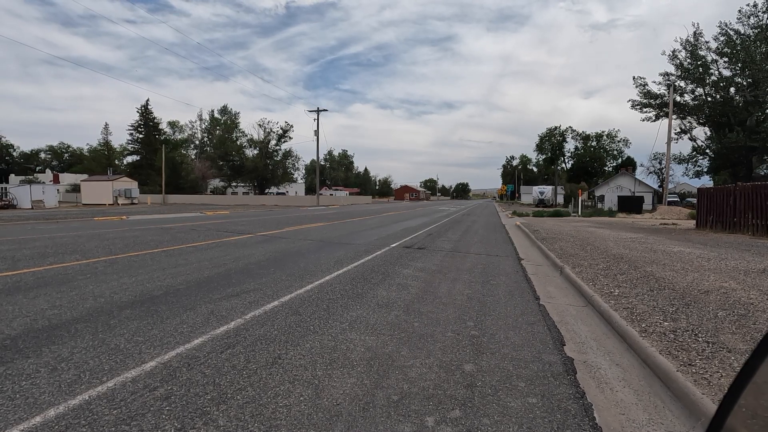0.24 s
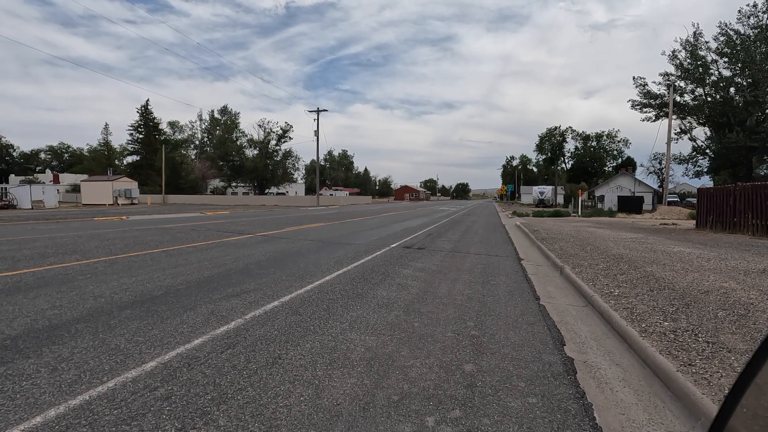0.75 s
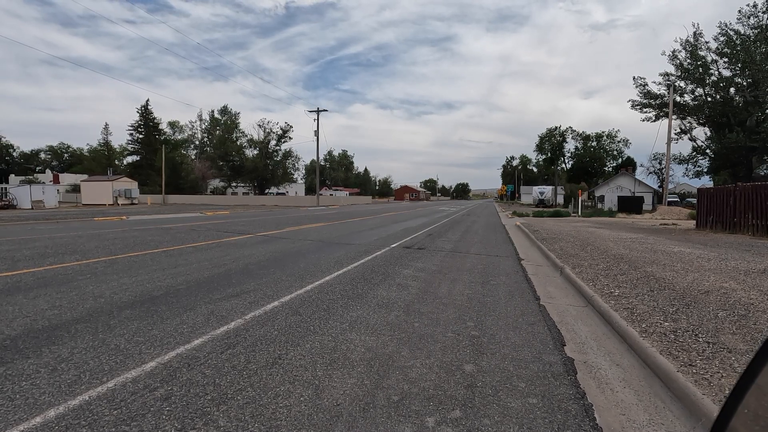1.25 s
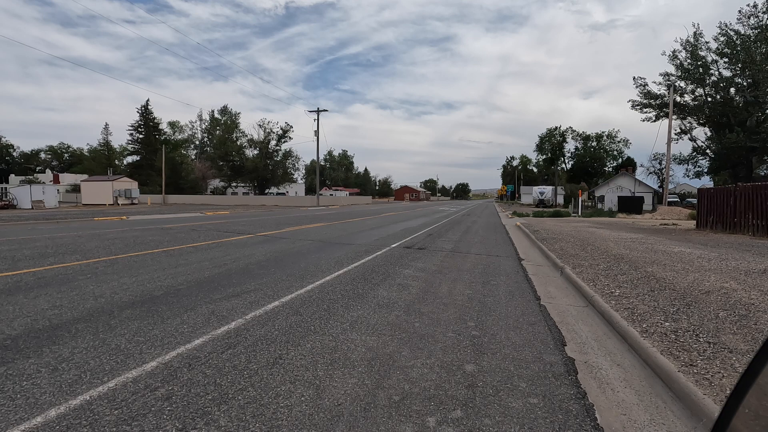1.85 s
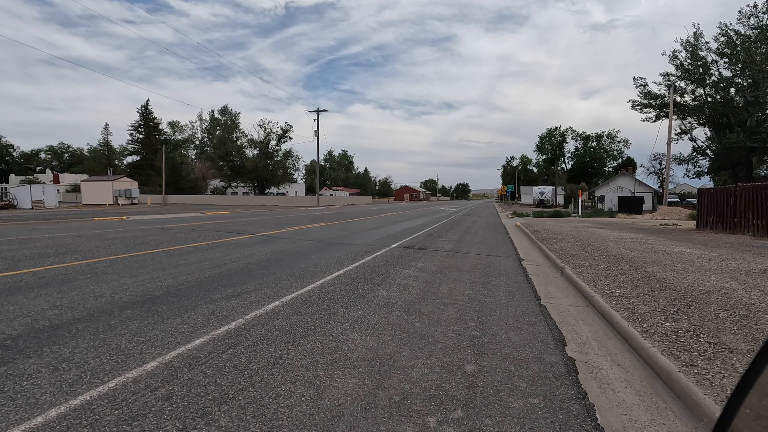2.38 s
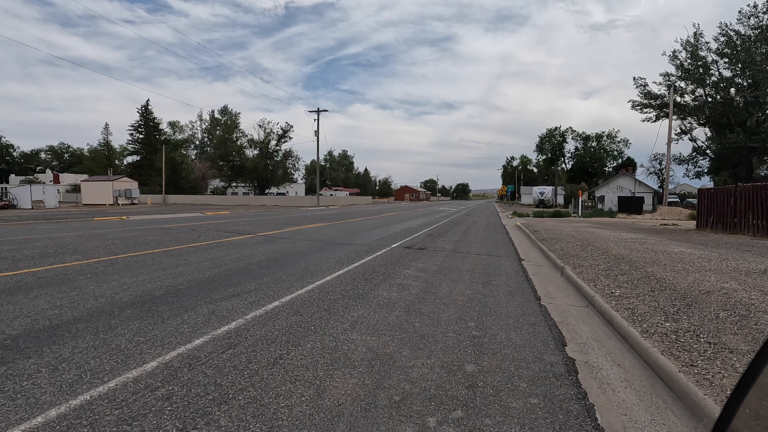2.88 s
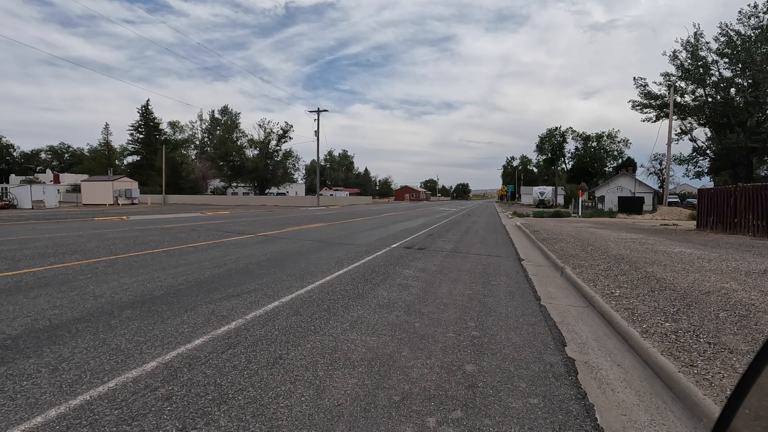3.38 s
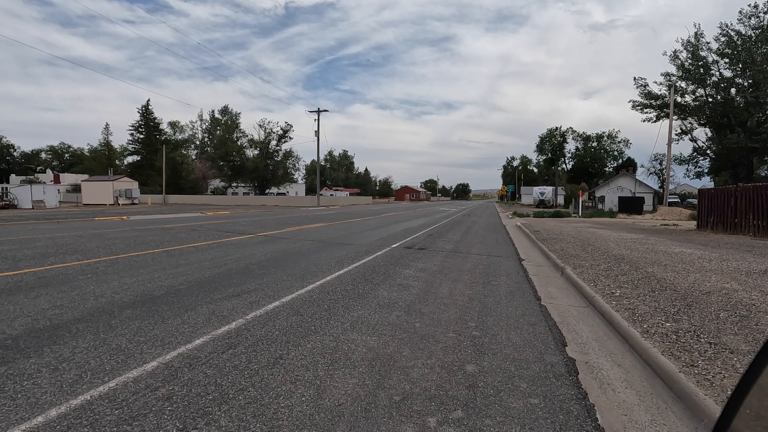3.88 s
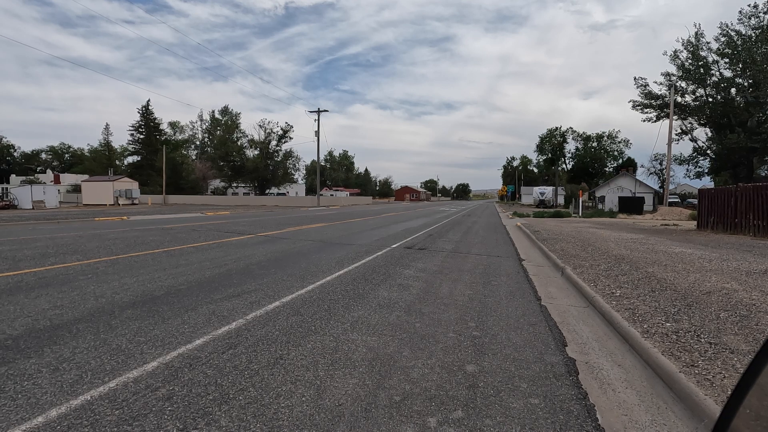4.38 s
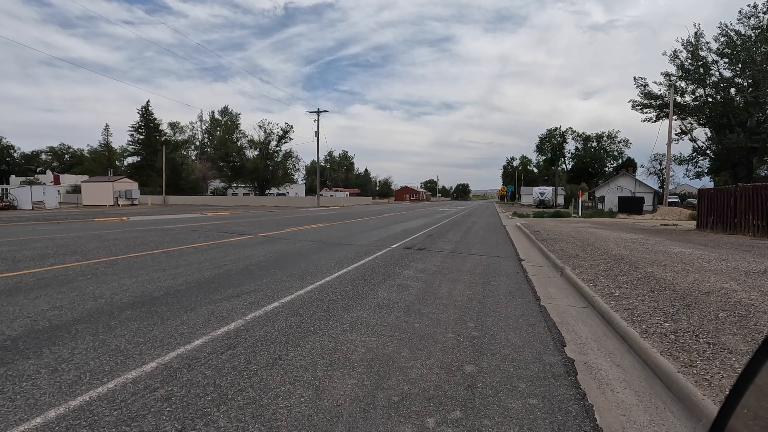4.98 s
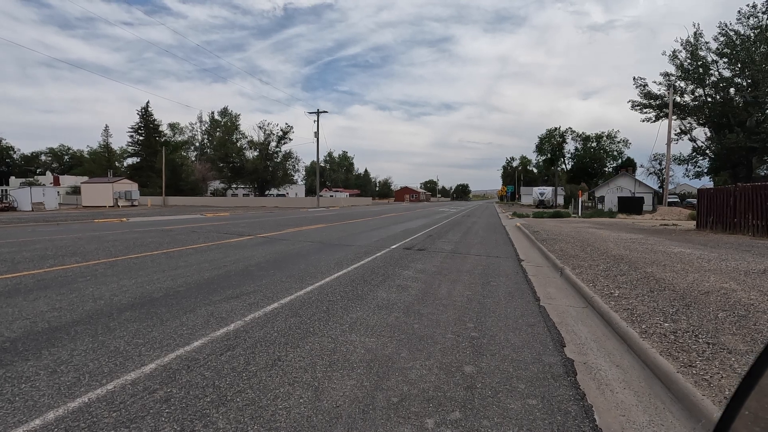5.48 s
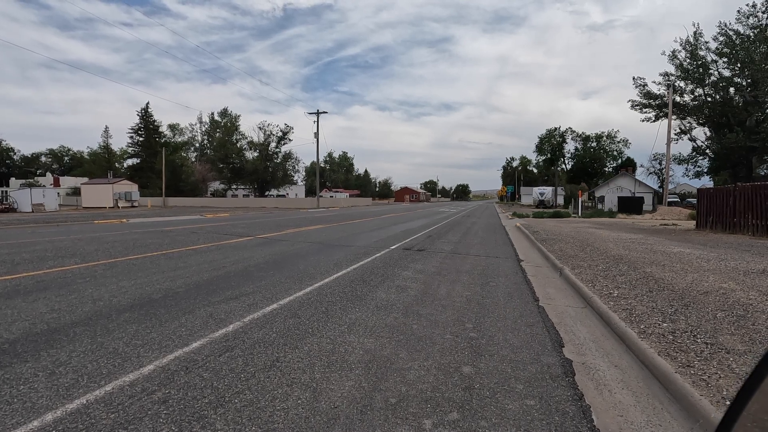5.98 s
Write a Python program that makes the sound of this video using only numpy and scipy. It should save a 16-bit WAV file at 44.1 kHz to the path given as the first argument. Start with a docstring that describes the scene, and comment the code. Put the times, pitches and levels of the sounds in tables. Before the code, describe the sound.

A motorcycle's starter grinds and chugs through two failed cranking attempts, whirring down between them while a vehicle passes on a quiet street.

```python
"""A motorcycle's starter cranks its V-twin engine in two tries without catching; a last grind begins a third.
Gear teeth grind, crackle, hum and squeal under each compression, and the starter whirrs down between tries.
Each exhaust stroke is a tone that glides upward, short barks are hoarse gliding tones, and a kickback knocks.
Behind it all, another vehicle swells and fades: steady engine tones over a rush of noise."""
import sys
import numpy as np
from scipy import signal
from scipy.io import wavfile

SR = 44100
rng = np.random.default_rng(int(sys.argv[2]) if len(sys.argv) > 2 else 0)


def unload_wav(signal):
    """Save mono or channel-first audio to the path in sys.argv[1] as 16-bit WAV at rate SR, clipped to [-1, 1]."""
    wavfile.write(
        sys.argv[1],
        SR,
        np.round(np.clip(np.atleast_2d(signal).T, -1, 1) * 32767).astype(np.int16),
    )


N = 275184
T = np.arange(N) / SR   # time of each sample in seconds

# Presses of the starter button.
# Each row: pressed at seconds, released at seconds, coasting time in seconds, whirr in relative dB.
PRESSES = [(-.5, .845, .6, -44.5), (3.79, 5.412, .81, -35)]
# Compressions that load the starter.
# Each row: start in seconds, length in seconds, then grind, gear hum and crackle in relative dB.
LOADS = [(0.024, 0.091, -22, -31, -35), (0.172, 0.12, -22.5, -22.5, -34), (0.312, 0.096, -23.5, -24, -34),
         (0.463, 0.077, -33, -29, -39), (0.547, 0.13, -28, -30, -32.5), (0.744, 0.08, -24.5, -32, -35),
         (0.815, 0.039, -29, -26, -33), (3.788, 0.115, -27, -26, -36), (3.88, 0.097, -24.5, -44, -29),
         (3.952, 0.099, -26.5, -24.5, -38), (4.096, 0.064, -23.5, -23, -27),
         (4.155, 0.074, -21, -19.5, -36), (4.237, 0.096, -24, -22, -27.5), (4.376, 0.089, -21, -25, -30.5),
         (4.485, 0.057, -23.5, -19, -41), (4.546, 0.078, -27, -24, -28.5), (4.669, 0.1, -23, -31, -32.5),
         (4.843, 0.09, -22.5, -28, -32), (4.983, 0.058, -26.5, -28, -34), (5.099, 0.1, -23.5, -26, -29),
         (5.281, .09, -24.5, -26, -37), (5.382, 0.047, -28.5, -23, -43), (6.219, 0.11, -20, -32, -30)]
# Overtones of the gear hum. Each row: multiple of the tooth rate, relative level in dB.
GEAR_OVERTONES = [(1, 0), (2, -8), (3, -17), (4, -14), (5, -18), (6, -20), (7, -19)]
# Hard steel parts that the crackle sets ringing. Each row: pitch in Hz, width in Hz.
STEEL_PARTS = [(2650, 560), (3200, 270), (3650, 900), (4150, 1050), (5100, 330)]
# Resonances of the crankcase.
# Each row: pitch in Hz, width in Hz (65 at least is used), average level in dB over the plain sound.
CASTING = [(531, 56, 12), (1036, 310, 10), (1686, 410, 5), (1708, 25, 11), (1830, 50, 6), (2230, 246, 14),
           (2650, 164, 10.5), (2986, 253, 10.5), (3504, 21.7, 9), (3893, 28, 11.5), (4100, 37, 4),
           (5160, 36, -3.5)]
# Tone colours of the noisy sounds. Each row: frequency in Hz, relative level in dB.
GRINDING = [(100, -36), (200, 10.5), (310, 15.5), (500, -1), (720, -4), (1300, -2.5), (2200, -9),
            (4000, -8), (5500, -11), (7500, -15.5), (10500, -17.5), (11500, -30), (15000, -43)]
WHIRRING = [(120, 18.5), (400, 8), (1100, -3), (2000, -7.5), (3400, -3), (4300, -1.5), (5200, -7.5),
            (7000, -9.5), (8500, -17), (10500, -16), (12000, -34), (15000, -103)]
RASPING = [(200, -14), (700, 0), (1050, 0), (1450, -11), (1820, 4), (2100, -6), (2400, -5), (3000, -14),
           (6000, -27), (14000, -62)]
CLASHING = [(120, -41), (350, 8.5), (900, 8), (1800, -11), (3800, -4), (7000, -4.5), (11000, -14.5),
            (15000, -111)]
RUSH = [(30, -36), (65, -11), (105, -1.5), (170, 0.5), (330, -0.5), (650, -5), (1100, -9), (1800, -18.5),
        (3500, -20.5), (6000, -33), (8500, -44.5), (10500, -45.5), (12000, -65), (15000, -58)]
# Gear squeals: gliding overtones of the gear hum, mostly falling under load.
# Each row: start in seconds, length in seconds, first Hz, last Hz, squeal in dB, shrill ring in dB.
GEAR_SQUEALS = [(0.039, 0.037, 1630, 1520, -19.5, -24), (0.203, 0.031, 1720, 1535, -13.5, -18),
                (0.337, 0.018, 1740, 1610, -17, -28), (0.594, 0.059, 1785, 1542, -25, -28),
                (0.768, 0.045, 1730, 1480, -18.5, -21), (3.883, 0.085, 2760, 2560, -22.5, -32),
                (3.935, 0.036, 1317, 930, -16.5, -21), (3.965, 0.059, 885, 834, -25, -40),
                (3.97, 0.025, 1585, 1610, -21.5, -38), (4.26, 0.041, 1957, 1644, -24, -27),
                (4.397, 0.045, 1936, 1610, -26, -25), (4.57, .04, 1860, 1710, -35, -27),
                (4.697, 0.037, 1746, 1490, -17, -20), (4.866, 0.032, 1686, 1500, -16, -18.5),
                (5.091, .075, 1019, 983, -23, -38), (5.15, .03, 1798, 1530, -12.5, -20.5),
                (5.279, 0.064, 1753, 1636, -22, -28.5)]
# One groan under load. The values: start in seconds, length in seconds, first Hz, last Hz, level in dB.
GROAN = (3.893, 0.08, 335, 250, -11)
# Spells of evenly spaced exhaust strokes, the second one slower as the engine coasts.
# Each row: first exhaust stroke in seconds, end in seconds, engine cycle in seconds, level in relative dB.
STROKE_SPELLS = [(-.028, 0.805, 0.29, -23.5), (0.831, 1.127, .36, -30), (4.031, 5.421, .3015, -21.5)]
# Exhaust strokes of the two cylinders.
# Each row: delay and length as shares of the cycle, first Hz, last Hz, level in relative dB.
CYLINDERS = [(0, 0.357, 65.2, 99, 0), (0.417, 0.301, 79, 135.3, 1.5)]
# Short barks of the labouring starter and engine.
# Each row: start in seconds, length in seconds, first Hz, last Hz, tone in dB, rasp in relative dB.
BARKS = [(0.78, 0.032, 356, 310, -14.5, -27), (0.823, 0.045, 470, 407, -23, -56),
         (0.938, 0.04, 554, 485, -29.5, -55), (3.944, 0.068, 544, 425, -19, -43),
         (4.014, 0.048, 591, 464, -13, -28.5), (4.705, 0.031, 436.4, 350, -14, -37),
         (4.74, 0.045, 560, 466, -19, -26.5), (4.868, 0.065, 356, 286.5, -15.5, -24.5),
         (4.913, 0.046, 564, 500, -19, -32.5), (5.17, 0.068, 301, 294.8, -17.5, -52),
         (5.211, 0.045, 519, 535, -14.5, -38), (5.274, 0.035, 620, 516, -16.5, -46),
         (5.336, 0.045, 380, 330, -19, -37), (5.46, 0.031, 632, 543, -22, -60),
         (5.637, 0.075, 563.6, 611.4, -21.5, -31), (5.659, 0.024, 662, 690, -13, -32),
         (5.648, 0.047, 842, 783, -28, -46), (5.669, 0.04, 990, 1080, -20, -45),
         (5.693, 0.032, 1760, 1910, -32, -27), (5.696, 0.019, 2730, 2980, -37, -38),
         (5.65, .1, 311.3, 344, -27.5, -40.5), (6.174, 0.026, 698.5, 601, -29, -48)]
# Knocks of the kickback, the solenoid and the gears.
# Each row: start in seconds, thud in dB, clash in relative dB, extra treble in dB, gear ring in relative dB.
KNOCKS = [(0.3876, 9, -11.5, 9.5, -2), (3.653, -45, -36.5, -19, -31), (3.788, -48, -31, 3, -33),
          (3.7976, -9.5, -16.5, 4.5, -18), (3.8137, -15, -17.5, -15, -30), (3.8221, -1, -35, -18, -35),
          (3.834, -8, -26, -10, -45), (4.1, -26, -33, -8, -14), (4.16, -30, -39, -9, -20),
          (4.874, -25, -27.5, 2, -20), (5.167, -8, -19.5, -10, -13), (5.388, -12.5, -25, 2, -33)]
# Ringing tones of struck gears. Each row: pitch in Hz, relative level in dB, decay time in seconds.
GEAR_RING = [(1617, -0.5, 0.0029), (1956, 0, 0.0062), (2020, -1.5, 0.006), (2540, -11, 0.01),
             (4760, -11, 0.004), (4750, -19.5, 0.008)]
# Light clicks of the mechanism. Each row: start in seconds, level in relative dB.
CLICKS = [(0.425, -16), (2.626, -41)]
# Turning speed of the other vehicle's crank. Each row: time in seconds, turns per second.
CRANK = [(0, 11.6), (1.62, 11.87), (2.95, 12.43), (3.75, 12.6)]
# Tones of the other engine: the long ones swell later and linger, the short ones come earlier and briefly.
# Each row: multiple of the crank rate, relative level in dB.
LONG_ORDERS = [(8, -13), (9, -13), (10.5, -14), (11, -5), (12, -14), (13, 0.5), (14, -17), (15, -10),
               (31, -9.5), (35, -11)]
SHORT_ORDERS = [(16, 0), (22, -17), (27, -14), (39, -13), (53, -17)]

TOOTH_HZ = 517   # gear teeth per second of the unloaded starter
SPIN_UP_S, LABOUR_SPEED = .215, .66   # just after a press it labours at this share of its speed
LABOUR_GRIND_DB = 7   # the running gears are louder by this much while it labours
SAG_PER_S, RECOVERY = 1.7, 1.4   # peak share of speed lost per second of load; dip length over load length
WHIRR_FADES_HZ = 189   # below this tooth rate the whirr dies away
KICKBACK_S, THROWN_OUT_S, THROWN_OUT_DB = .398, .068, -8   # the kickback throws the gears out of mesh
MESH_DB, GEAR_HUM_DB = -33, -39   # grind and hum of running gears, in relative dB
CHURN_DB, WHINE_DB = -32, -44   # noise of the turning engine; whine before its resonance
ROTOR_DB = -16   # singing of the rotor, over the whirr setting
CASE_HZ, CASE_WIDTH_HZ = 4500, 500   # resonance of the starter's housing
CRACKLES_PER_S = 1300   # average rate of tiny impacts
TIRING_DB = -8   # the exhaust strokes weaken by about this much towards the end of a spell
# Passing of the other vehicle: loudest at seconds, time to fall by 3 dB in seconds, top level in relative dB.
LONG_PASS = (3.32, .57, -36)
SHORT_PASS = (2.82, .3, -33)
RUSH_PASS = (3.16, .76, -33)
CUTOFF_HZ = 16200   # top of the treble


def starter(flutter=.0064, rattle_db=2.0):
    """Gears grind, crackle and hum at the tooth rate, the rotor whirrs and sings, and the engine churns."""
    tooth_hz, drive, labour, whirr_gain = motor()
    grind, hum, crackling, sag = compressions()
    grind = grind + drive * from_db(MESH_DB + LABOUR_GRIND_DB * labour)
    hum = hum + drive * from_db(GEAR_HUM_DB)
    angle = angle_of(tooth_hz * (1 - sag))
    mesh = angle + angle_of(flutter * tooth_hz * drift(150))   # backlash lets the teeth flutter
    contacts = teeth(mesh, uneven_db=2.5, scrape=1.45, throb=.5)
    rattle = from_db(rattle_db * drift(260))
    gears = coloured(crankcase(.5 * grind * rattle * contacts), GRINDING)
    coasting = teeth(angle, uneven_db=2, scrape=2, throb=.2)
    whirr = coloured(crankcase(.5 * whirr_gain * coasting), WHIRRING)
    singing = whine(angle, drive) + whirr_gain * from_db(ROTOR_DB) * rotor(angle)
    churn = coloured(drive * from_db(CHURN_DB) * rng.standard_normal(N), RUSH)
    return panels(gears + whirr) + crackling * crackle() + singing + hum * gear_hum(mesh) + churn


def motor(steepness=14, let_go_s=.098):
    """The starter labours, reaches full speed and coasts: tooth rate, drive 0-1, labour 0-1, whirr gain."""
    tooth_hz, drive, labour, whirr = np.zeros((4, N))
    for pressed, released, coast_s, db in PRESSES:
        on = T >= pressed
        coasted = np.maximum(T[on] - released, 0)
        labour[on] = 1 - np.minimum((T[on] - pressed) / SPIN_UP_S, 1) ** steepness
        tooth_hz[on] = TOOTH_HZ * (1 - (1 - LABOUR_SPEED) * labour[on]) * np.exp(-coasted / coast_s)
        drive[on] = np.exp(-coasted / let_go_s)
        whirr[on] = from_db(db) * np.minimum(tooth_hz[on] / WHIRR_FADES_HZ, 1) ** 2
    thrown_out = (T > KICKBACK_S) & (T < KICKBACK_S + THROWN_OUT_S)
    meshed = from_db(THROWN_OUT_DB * thrown_out)
    return tooth_hz, drive * meshed, labour, whirr * meshed


def compressions(bite_s=.0062, pedestal=.78, release=.59, jolt=.38, jolt_s=.0055):
    """Compression presses the teeth and slows the motor: grind, hum and crackle gains, share of speed lost."""
    grind, hum, crackling, sag = np.zeros((4, N))
    for start, length, db, hum_db, crackle_db in LOADS:
        at, u = span(start, length)
        age = u * length
        # the teeth bite with a jolt, then ease off towards the top of the compression
        bite = np.minimum(age / bite_s, 1)
        pressure = pedestal + (1 - pedestal) * np.sin(np.pi * u)
        easing = np.minimum((1 - u) / release, 1)
        load = bite * pressure * easing * (1 + jolt * np.exp(-age / jolt_s))
        grind[at] += from_db(db) * load
        crackling[at] += from_db(crackle_db) * load
        hum[at] += from_db(hum_db) * np.sin(np.pi * u)
        # the flywheel makes the speed lag behind the load
        at, u = span(start, RECOVERY * length)
        sag[at] += SAG_PER_S * length * np.sin(np.pi * u) ** 2
    return grind, hum, crackling, np.clip(sag, 0, .8)


def teeth(angle, uneven_db, scrape, throb):
    """One impact per gear tooth, each with its own strength, and scraping that pulses along with them."""
    contact = np.diff(np.floor(angle / (2 * np.pi)), prepend=0)
    impacts = contact * from_db(uneven_db * np.clip(rng.standard_normal(N), -2, 2))
    # bring the average power to 1 at the fastest tooth rate
    top_rate = np.max(np.diff(angle)) / (2 * np.pi)
    impacts /= np.sqrt(np.mean(impacts[contact > 0] ** 2) * top_rate)
    scraping = rng.standard_normal(N) * (1 + throb * np.cos(angle))
    return (impacts + scrape * scraping) / np.hypot(1, scrape)


def gear_hum(mesh):
    """The meshing teeth hum on overtones of the tooth rate, the first four wavering more and more."""
    tone = np.zeros(N)
    for k, db in GEAR_OVERTONES:
        waver_db = min(k, 4) * drift(45)
        tone += from_db(db + waver_db) * np.sin(k * mesh + rng.uniform(0, 2 * np.pi))
    return tone


def crackle(uneven_db=-3.5, dull_hz=7000):
    """The loaded gear train crackles: tiny uneven impacts at random, each ringing one steel part; rms 1."""
    hit = rng.random(N) < CRACKLES_PER_S / SR
    sizes = from_db(uneven_db * np.clip(rng.standard_normal(N), -2, 2)) * rng.choice([-1, 1], N)
    part = rng.integers(0, len(STEEL_PARTS), N)
    rings = np.zeros(N)
    for k, (hz, width) in enumerate(STEEL_PARTS):
        # the tiny offset keeps numbers from getting too small to compute quickly
        rings += resonance(hit * sizes * (part == k) + 1e-18, hz, width)
    return rms_one(signal.sosfilt(signal.butter(2, dull_hz, fs=SR, output="sos"), rings))


def rotor(angle, count=36, spread_db=3):
    """The commutator and bearings sing on many multiples of the shaft, which turns once in nine teeth."""
    shaft = angle / 9
    multiples = 36 + 3 * np.arange(count)
    gains = from_db(spread_db * rng.standard_normal(count)) / np.hypot(1, (multiples / 95) ** 4)
    singing = np.zeros(N)
    for multiple, gain in zip(multiples, gains):
        singing += gain * np.sin(multiple * shaft + rng.uniform(0, 2 * np.pi))
    return rms_one(singing)


def whine(angle, drive):
    """The driven commutator whines unsteadily, loudest near full speed, where it meets the housing's resonance."""
    tone = from_db(4 * drift(90)) * np.sin(9 * angle + .7 * drift(260))
    return resonance(from_db(WHINE_DB) * drive ** 2 * tone, CASE_HZ, CASE_WIDTH_HZ)


def crankcase(x):
    """The casting adds its resonances, each stronger or weaker as the point of contact moves."""
    out = x.copy()
    for hz, width, db in CASTING:
        out += resonance(x * from_db(db + 4.5 * drift(18)), hz, max(width, 65))
    return out


def panels(x, ring_db=-5, ring_s=.01, count=4):
    """Tank and covers add a short, dense ring; the shaking shifts from one panel to another."""
    age = np.arange(SR // 20) / SR
    shares = np.array([drift(22) for _ in range(count)])
    ring = np.zeros(N)
    for share in shares / np.linalg.norm(shares, axis=0):
        tail = rng.standard_normal(len(age)) * np.exp(-age / ring_s)
        ring += signal.fftconvolve(x * share, tail / np.linalg.norm(tail))[:N]
    ring = signal.sosfilt(signal.butter(2, 1100, "high", fs=SR, output="sos"), ring)
    return (x + from_db(ring_db) * ring) / np.hypot(1, from_db(ring_db))


def groan(bend=2.6, overtone_db=-17):
    """Heaving the engine over a compression, the starter groans on one clean note that drops ever faster."""
    start, length, first_hz, last_hz, db = GROAN
    out = np.zeros(N)
    at, u = span(start, length)
    angle = angle_of(first_hz + (last_hz - first_hz) * u ** bend)
    out[at] = from_db(db) * np.sin(np.pi * u) * (np.sin(angle) + from_db(overtone_db) * np.sin(4 * angle))
    return out


def gear_squeals(ring_hz=3600, ring_fall=.088, ring_lead_s=.0067, ring_width_hz=450):
    """Overtones of the gear hum squeal, mostly falling under load; a shrill, rough ring comes just ahead."""
    out = np.zeros(N)
    ring_first_hz, ring_last_hz = ring_hz * (1 + ring_fall / 2), ring_hz * (1 - ring_fall / 2)
    for start, length, first_hz, last_hz, db, ring_db in GEAR_SQUEALS:
        at, u = span(start, length)
        out[at] += from_db(db) * hoarse_glide(u, first_hz, last_hz, hoarse=.45, width_hz=260)
        at, u = span(start - ring_lead_s, length)
        out[at] += from_db(ring_db) * hoarse_glide(u, ring_first_hz, ring_last_hz, 1, ring_width_hz)
    return out


def exhaust(bend=1.3, opening_s=.00031, first_share=.81, closing=.014, pop_db=-5):
    """The rising piston shrinks the cylinder behind the open valve, so the pipe's boom glides upward."""
    out = np.zeros(N)
    for start, length, first_hz, last_hz, db in strokes():
        at, u = span(start, length * (1 + closing))
        u = u * (1 + closing)   # the boom fades while the valve closes
        age = u * length
        angle = angle_of(first_hz + (last_hz - first_hz) * u ** bend)
        valve_closing = np.clip((1 + closing - u) / (2 * closing), 0, 1)
        boom = (first_share + (1 - first_share) * u) * valve_closing * np.sin(angle)
        pop = np.exp(-age / .007) * np.sin(3 * angle)
        opening = 1 - np.exp(-age / opening_s)
        out[at] += from_db(db) * opening * (boom + from_db(pop_db) * pop)
    return out


def strokes(tiring_power=2.6):
    """The cylinders exhale in turn, once per engine cycle: start and length in s, first Hz, last Hz, dB."""
    rows = []
    for first, end, cycle_s, spell_db in STROKE_SPELLS:
        for cycle in np.arange(first, end, cycle_s):
            for delay, length, first_hz, last_hz, db in CYLINDERS:
                start = cycle + delay * cycle_s
                tired_db = TIRING_DB * ((start - first) / (end - first)) ** tiring_power
                rows.append((start, length * cycle_s, first_hz, last_hz, spell_db + db + tired_db))
    return rows


def barks(width_hz=280, hoarse=.86):
    """The labouring starter and engine bark briefly: hoarse gliding tones with a rasp on them."""
    tone, rasp = np.zeros((2, N))
    for start, length, first_hz, last_hz, tone_db, rasp_db in BARKS:
        at, u = span(start, length)
        tone[at] += from_db(tone_db) * hoarse_glide(u, first_hz, last_hz, hoarse, width_hz)
        rasp[at] += from_db(rasp_db) * np.sin(np.pi * u)
    return tone + coloured(rasp * rng.standard_normal(N), RASPING)


def knocks(thud_hz=300, thud_s=.006, clash_s=.0073, click_s=.009, rise_s=.0013, snap_s=.00041,
           bright_hz=3800, click_body_db=-16):
    """The frame thuds under clashing steel and ringing gears; light clicks are mostly treble."""
    thuds, rings, dull, bright = np.zeros((4, N))
    age = np.arange(SR // 8) / SR
    attack, snap = 1 - np.exp(-age / rise_s), 1 - np.exp(-age / snap_s)
    thud = attack * np.exp(-age / thud_s) * np.sin(2 * np.pi * thud_hz * age)
    for start, thud_db, clash_db, bright_db, ring_db in KNOCKS:
        at = round(start * SR) + np.arange(len(age))
        thuds[at] += from_db(thud_db) * thud
        for hz, db, decay_s in GEAR_RING:
            ring = np.exp(-age / decay_s) * np.sin(2 * np.pi * (hz * age + rng.random()))
            rings[at] += from_db(ring_db + db) * snap * ring
        clash = from_db(clash_db) * snap * np.exp(-age / clash_s)
        dull[at] += clash
        bright[at] += from_db(bright_db) * clash
    for start, db in CLICKS:
        at = round(start * SR) + np.arange(len(age))
        click = from_db(db) * attack * np.exp(-age / click_s)
        dull[at] += from_db(click_body_db) * click
        bright[at] += click
    clashes = np.zeros(N)
    for side, gain in (("low", dull), ("high", bright)):
        band = signal.butter(3, bright_hz, side, fs=SR, output="sos")
        clashes += signal.sosfilt(band, gain * rng.standard_normal(N))
    return thuds + rings + coloured(crankcase(clashes), CLASHING)


def other_vehicle(throb=.08, rumble_db=-60):
    """Engine tones over a rush that throbs with three firings per turn, and a faint street rumble."""
    angle = angle_of(in_time(CRANK)[0])
    firing = 1 + throb * np.cos(3 * angle)
    out = coloured(from_db(passing(*RUSH_PASS)) * rng.standard_normal(N) * firing, RUSH)
    for orders, level_db in ((LONG_ORDERS, passing(*LONG_PASS)), (SHORT_ORDERS, passing(*SHORT_PASS))):
        for multiple, db in orders:
            gain = np.sqrt(2) * from_db(level_db + db + .7 * drift(6))   # a slight waver
            out += gain * np.sin(multiple * angle + rng.uniform(0, 2 * np.pi))
    rumble = signal.sosfilt(signal.butter(2, 70, fs=SR, output="sos"), rng.standard_normal(N))
    return out + from_db(rumble_db) * rms_one(rumble)


def passing(loudest_s, width_s, top_db):
    """Level in dB of a source going by on a straight road."""
    return top_db - 10 * np.log10(1 + ((T - loudest_s) / width_s) ** 2)


def hoarse_glide(u, first_hz, last_hz, hoarse, width_hz):
    """A gliding tone, partly clean and partly roughened by noise, that swells and fades over the progress u."""
    angle = angle_of(first_hz + (last_hz - first_hz) * u)
    smooth = signal.butter(2, width_hz / 2, fs=SR, output="sos")
    a, b = rms_one(signal.sosfilt(smooth, rng.standard_normal((2, SR // 4))))[:, -len(u):]
    rough = (a * np.sin(angle) + b * np.cos(angle)) / np.sqrt(2)
    return np.sin(np.pi * u) ** 2 * (np.sin(angle) + hoarse * rough) / np.hypot(1, hoarse)


def resonance(x, hz, width):
    """A two-pole filter that rings at one pitch, with a gain of about 1 there."""
    r = np.exp(-np.pi * width / SR)
    poles = [1, -2 * r * np.cos(2 * np.pi * hz / SR), r * r]
    return signal.lfilter(np.array([1, 0, -1]) * (1 - r * r) / 2, poles, x)


def coloured(x, spectrum, size=4096):
    """Filter with the given spectrum, without sounding early; steady white noise keeps its power."""
    hz, db = np.transpose(spectrum)
    grid = np.maximum(np.abs(np.fft.fftfreq(size, 1 / SR)), 1)
    gain = from_db(np.interp(np.log(grid), np.log(hz), db)) * np.minimum(grid / hz[0], 1)
    # the Hilbert transform of the log gain gives the phase that puts the energy first
    response = np.fft.ifft(np.exp(signal.hilbert(np.log(gain)).conj())).real[:size // 2]
    return signal.fftconvolve(x, response / np.linalg.norm(response))[:N]


def drift(rate):
    """Slow random wander: straight lines between random points, at the given points per second."""
    knots = rng.standard_normal(4000)
    return np.interp(T * rate, np.arange(len(knots)), knots)


def span(start, length):
    """The samples of an event, and its progress from 0 to 1."""
    at = np.flatnonzero((T >= start) & (T < start + length))
    return at, (T[at] - start) / length


def in_time(rows):
    """Each column of a curve, sample by sample."""
    s, *columns = np.transpose(rows)
    return [np.interp(T, s, c) for c in columns]


def angle_of(hz):
    """Running angle of a rotation, in radians."""
    return 2 * np.pi * np.cumsum(hz) / SR


def rms_one(x):
    """Scale to an rms level of 1."""
    return x / np.sqrt(np.mean(x ** 2) + 1e-20)


def from_db(db):
    """Decibels to gain."""
    return 10 ** (np.asarray(db) / 20)


def limiter(x, release_db_per_s=45):
    """Peaks over full scale turn the gain down at once; it recovers at a steady rate."""
    over_db = 20 * np.log10(np.maximum(np.abs(x).max(axis=0), 1))
    cut_db = np.maximum.accumulate(over_db + release_db_per_s * T) - release_db_per_s * T
    return x * from_db(-cut_db)


def scene(side_db=-8, side_hz=13000):
    """All sources add up in open air; mainly the top treble, above side_hz, differs between the channels."""
    mid = starter() + groan() + gear_squeals() + exhaust() + barks() + knocks() + other_vehicle()
    treble = signal.sosfilt(signal.butter(2, side_hz, "high", fs=SR, output="sos"), mid)
    side = from_db(side_db) * np.roll(treble, SR // 500)   # 2 ms late
    return mid + side * [[1], [-1]]


def record(dry, notch_hz=9000, notch_q=6, hiss_db=-92, low_cut_hz=56):
    """The microphone drops deep bass, its housing cuts a notch, hiss is added; peaks and top are cut."""
    heard = signal.lfilter(*signal.iirnotch(notch_hz, notch_q, SR), dry)
    heard = signal.sosfilt(signal.butter(3, low_cut_hz, "high", fs=SR, output="sos"), heard)
    heard = limiter(heard + from_db(hiss_db) * rng.standard_normal((2, N)))
    return signal.sosfilt(signal.cheby2(14, 70, CUTOFF_HZ, fs=SR, output="sos"), heard)


dry = scene()
out = record(dry)
unload_wav(out)
```